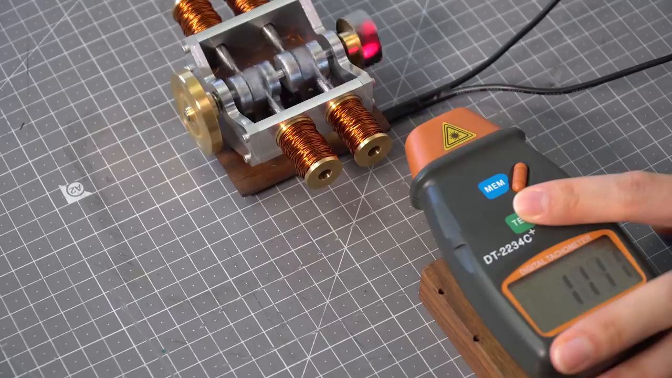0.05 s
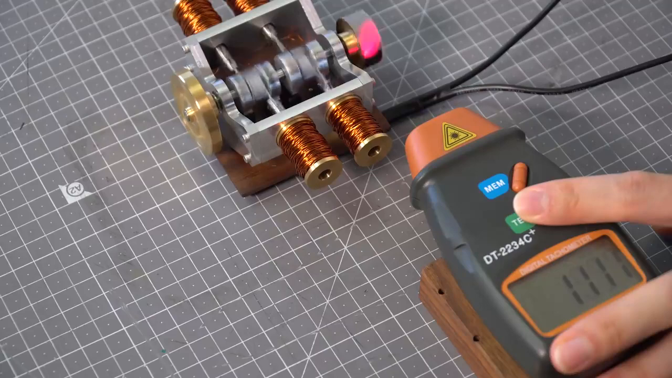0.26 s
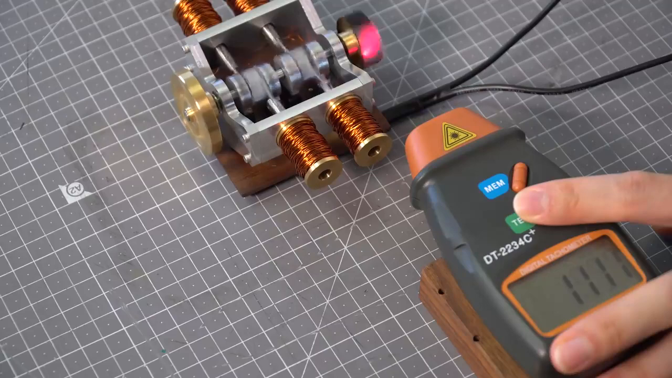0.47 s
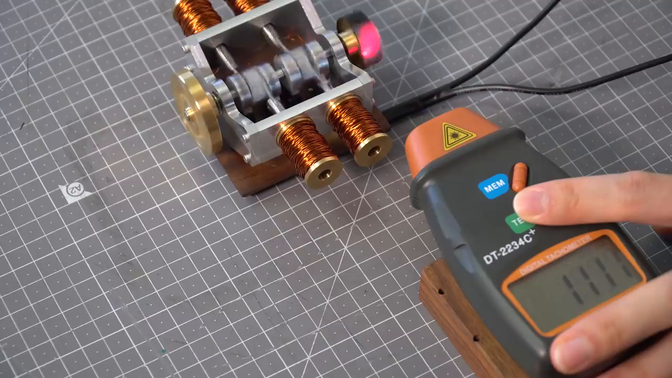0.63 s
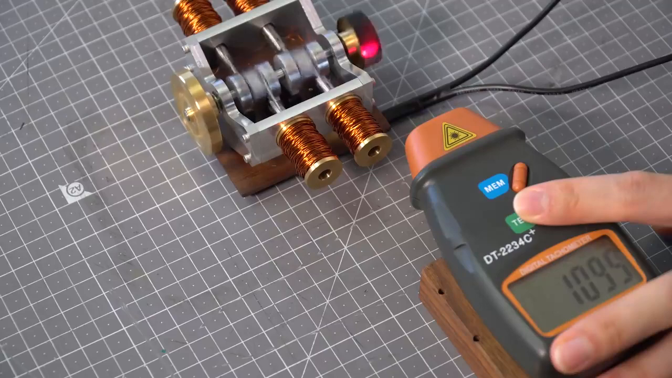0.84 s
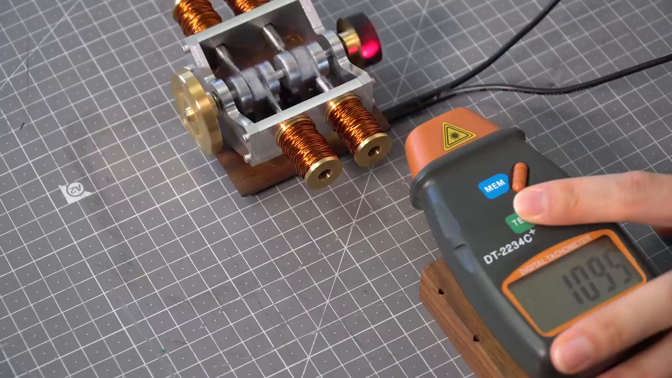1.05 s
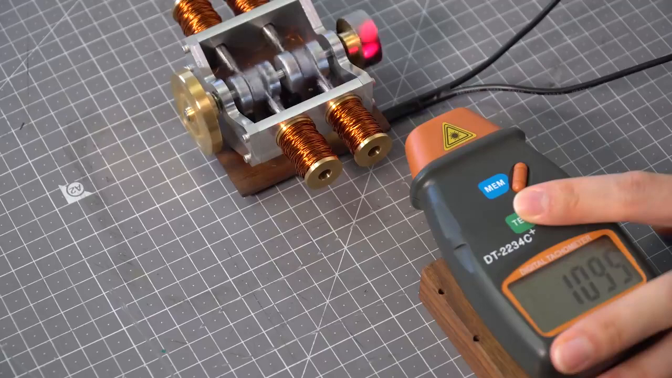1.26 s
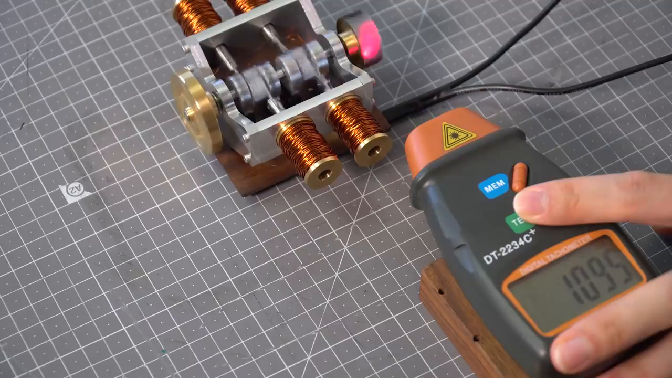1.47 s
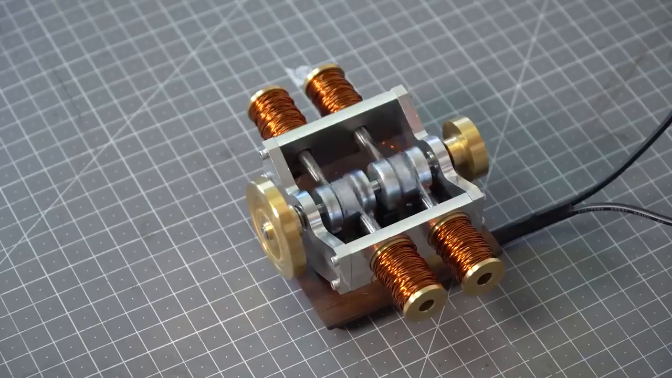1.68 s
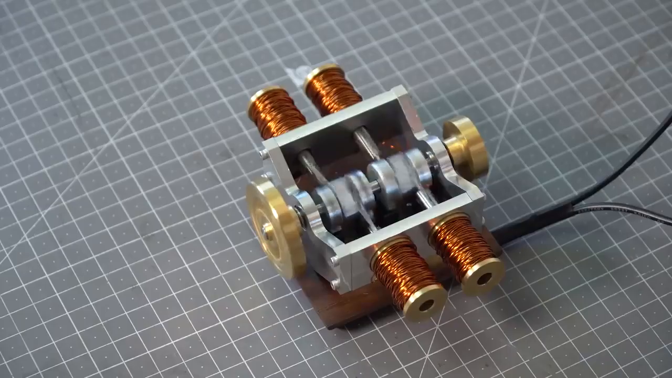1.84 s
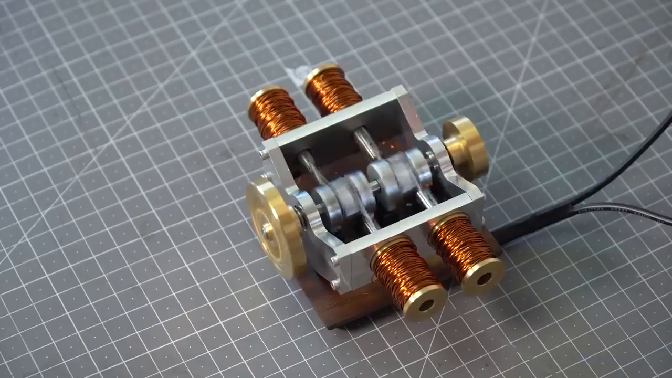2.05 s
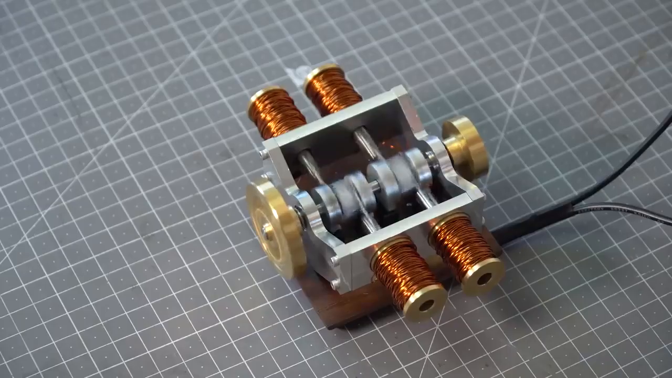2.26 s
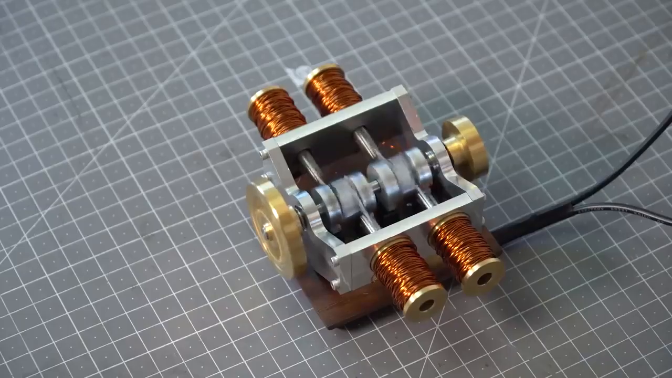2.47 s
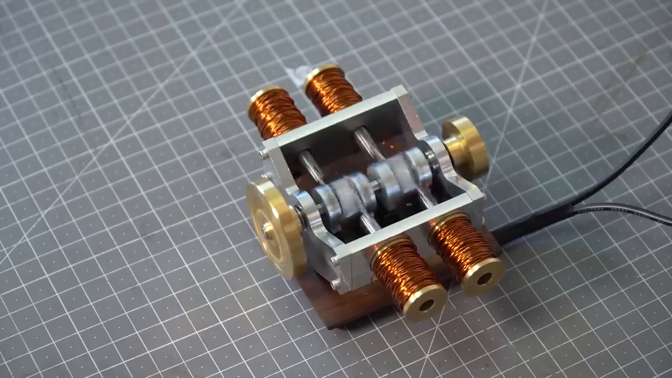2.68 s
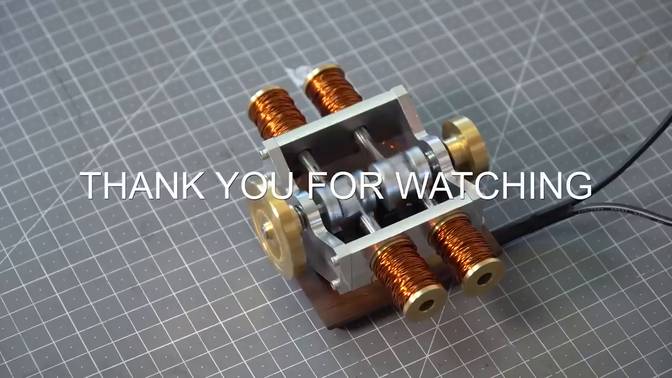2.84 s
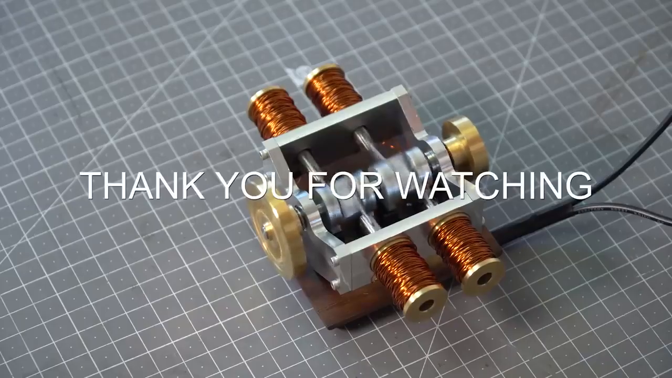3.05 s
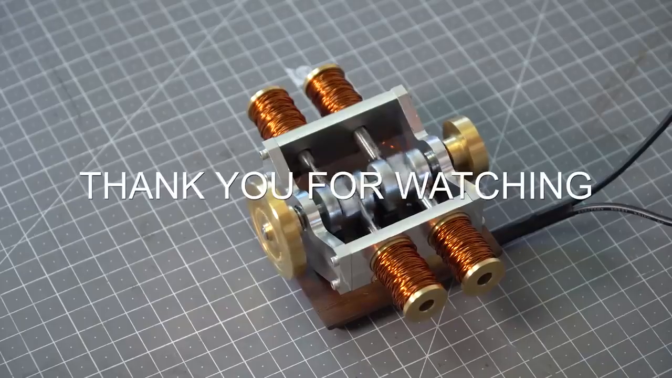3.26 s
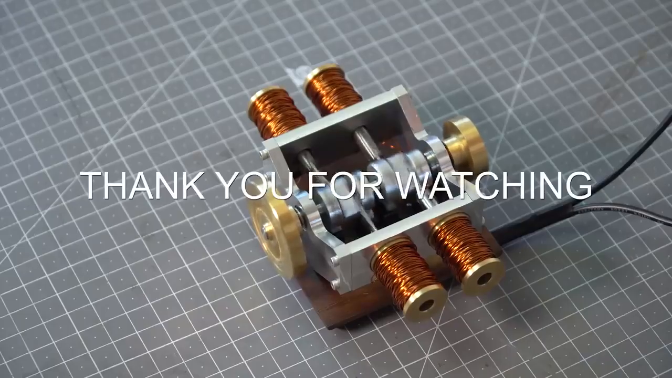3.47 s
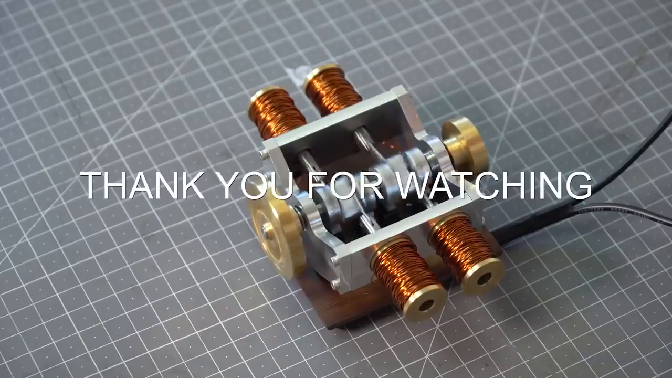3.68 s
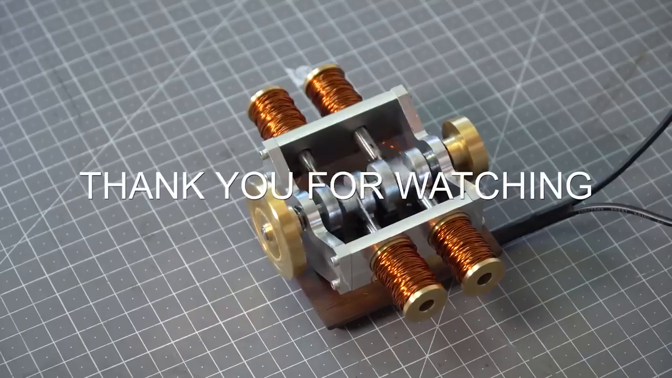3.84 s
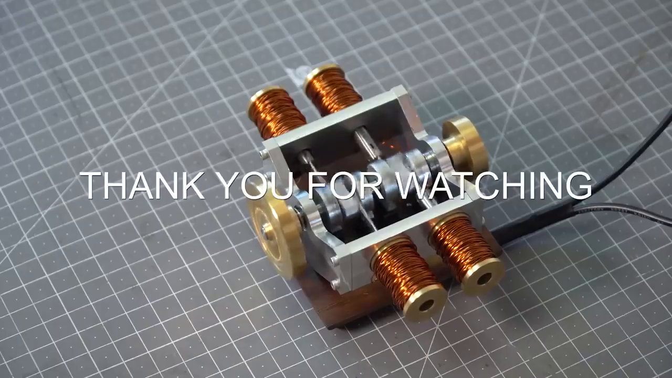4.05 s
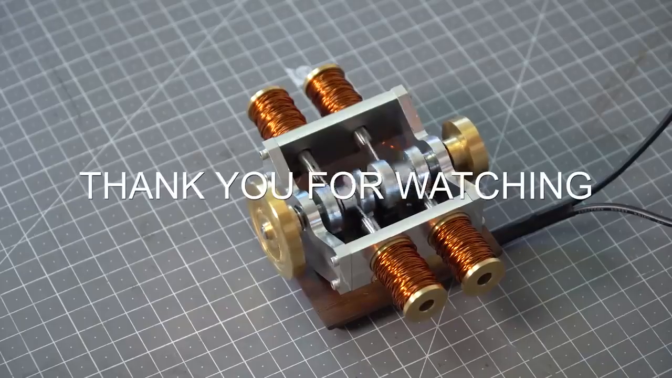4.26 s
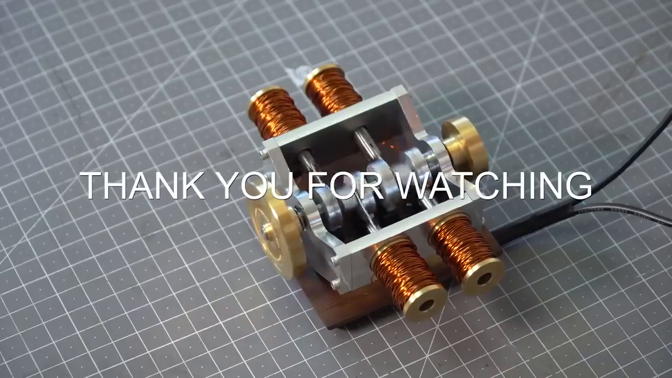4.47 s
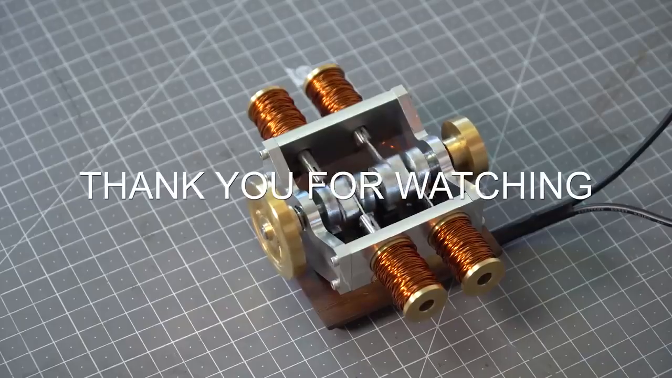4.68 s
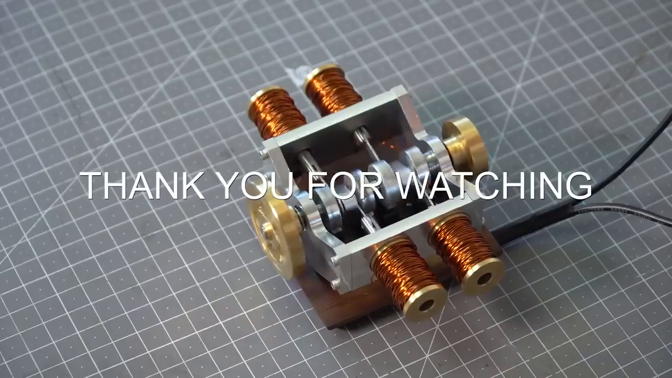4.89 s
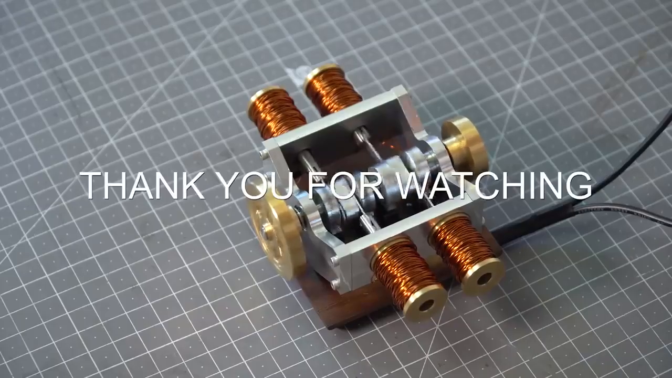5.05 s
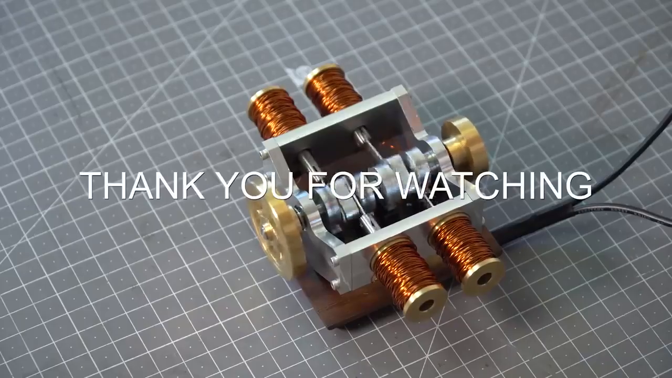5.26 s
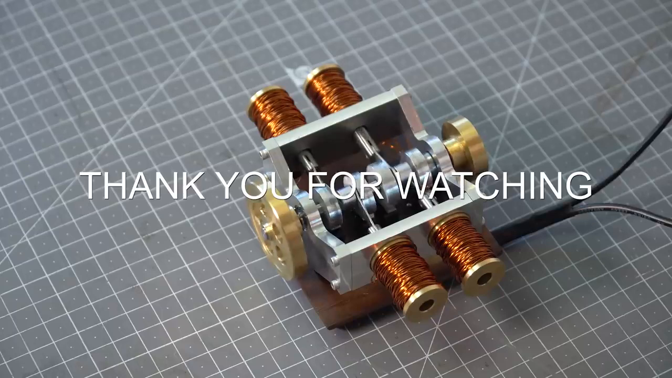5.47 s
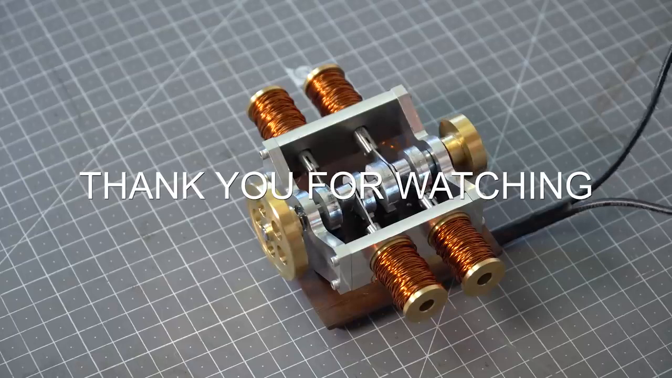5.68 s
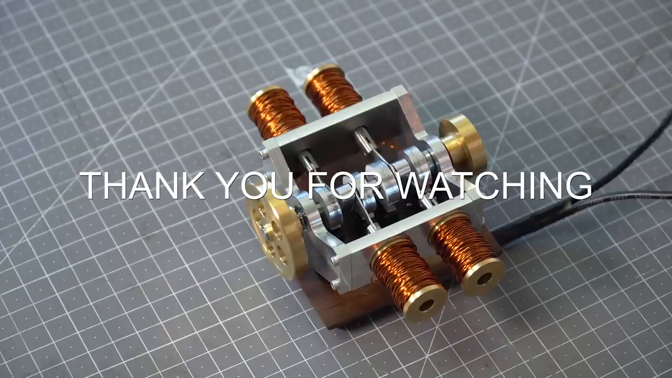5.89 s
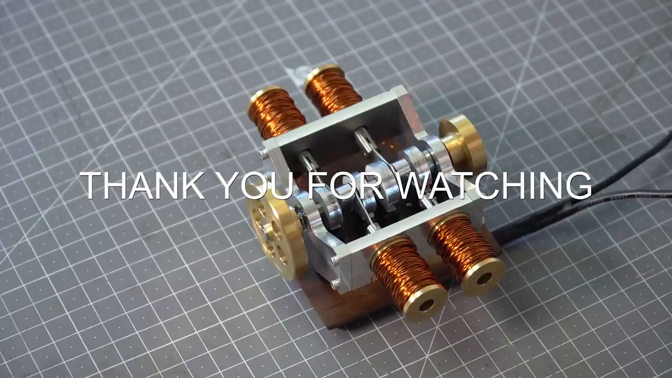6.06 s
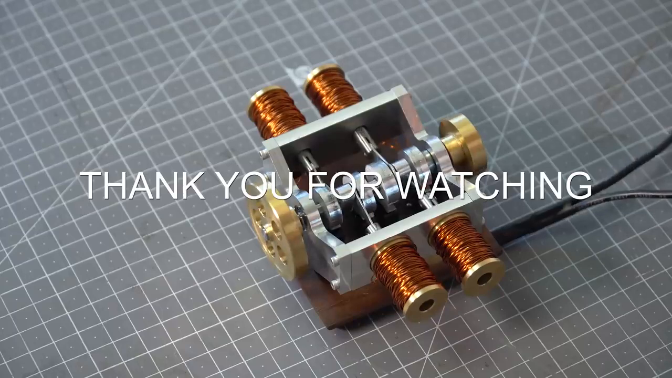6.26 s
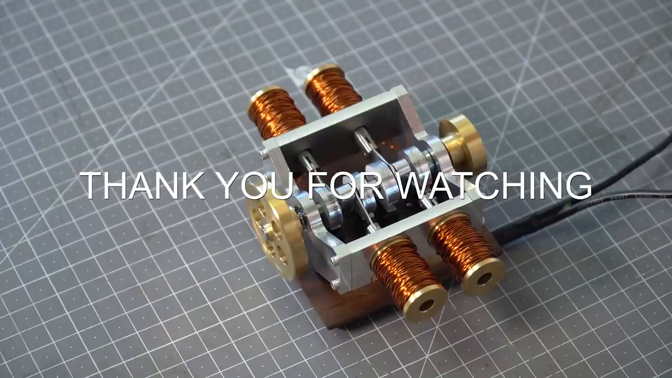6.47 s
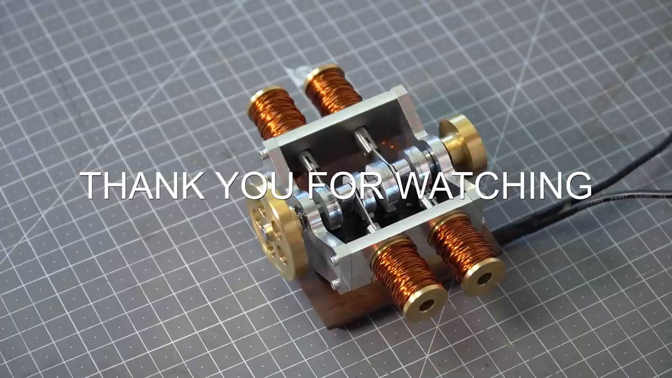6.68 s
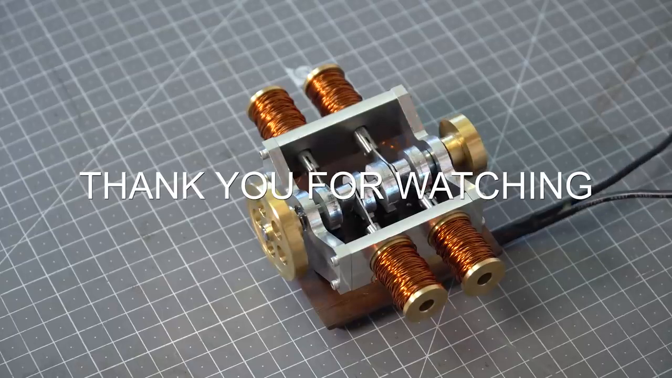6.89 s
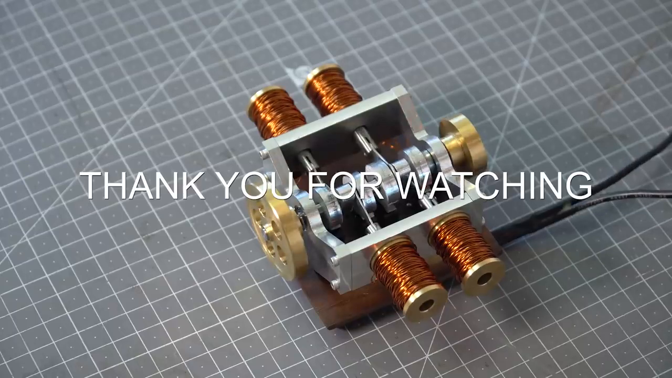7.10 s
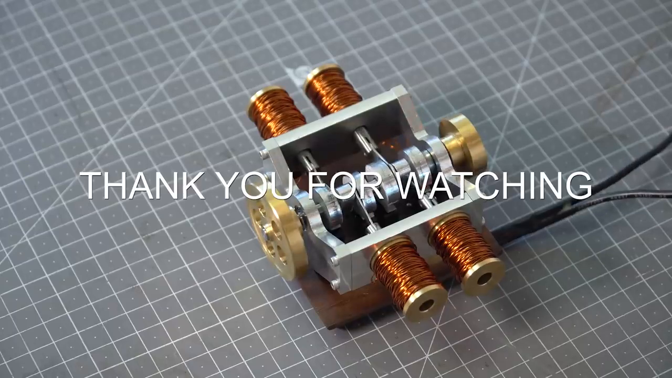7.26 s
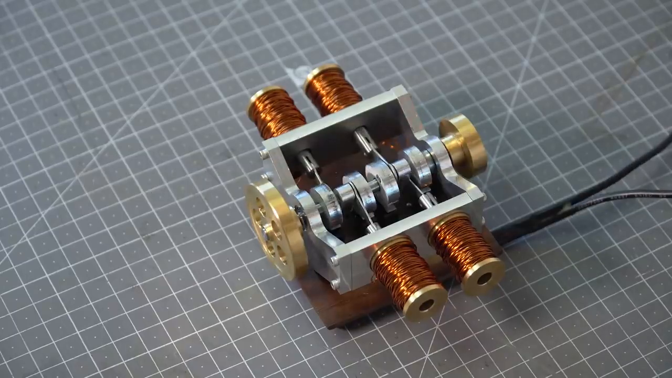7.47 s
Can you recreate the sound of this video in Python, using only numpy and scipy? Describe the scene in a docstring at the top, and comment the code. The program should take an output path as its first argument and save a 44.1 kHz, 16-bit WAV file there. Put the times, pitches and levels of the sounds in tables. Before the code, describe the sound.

A miniature solenoid engine runs on a table in a small room, its rods and plungers making a fast, even metallic clatter over a low hum. The clatter abruptly turns slightly faster. Then the power goes off and it slows and fades into separate ticks and clacks until the crank catches and stops. A few soft, dull bumps and faint scuffs follow, all heard from close by.

```python
"""A fast, even metallic clatter: a miniature four-coil solenoid engine on a cutting mat in a small room.
Each turn repeats a pattern of contact ticks and rod knocks over the plungers' rub, and shakes the table.
A second, faster run follows at once. The power goes off: drag and friction slow the crank, and its
loose rods tick and clack once a turn until it catches. Soft bumps and faint scuffs follow."""
import sys
import numpy as np
from scipy import signal
from scipy.fft import rfft, irfft
from scipy.io import wavfile

SR = 44100
rng = np.random.default_rng(int(sys.argv[2]) if len(sys.argv) > 2 else 0)


def transcribe(u):
    """Save the signal u as a 16-bit wav file named by the first command-line argument.

    u: samples, shape (n,) or (channels, n), limited to [-1, 1]; the rate is SR.
    q: integer samples, one column per channel.
    """
    v = np.clip(np.atleast_2d(u).T, -1, 1)
    q = np.round(v * 32767).astype(np.int16)
    wavfile.write(sys.argv[1], SR, q)


N = 332068
TIME = np.arange(N) / SR
SECOND_RUN_S, POWER_OFF_S, STOP_S = 1.75, 3.217, 5.66
FIRST_RUN = TIME < SECOND_RUN_S
FULL_TURNS_PER_S, CRAWL_TURNS_PER_S = 19, 2.9
DRIVE_DB_PER_OCTAVE = 13.5  # loss per halving of speed after power-off


def from_db(db):
    """Decibels to gain."""
    return 10 ** (np.asarray(db) / 20)


def rms_one(x):
    """Scale to unit power."""
    return x / np.sqrt(np.mean(x ** 2) + 1e-20)


def in_time(rows):
    """Rows of (s, value) to one value per sample."""
    return np.interp(TIME, *np.transpose(rows))


def drift(rate_hz):
    """Random wander of unit power, with rate_hz new values a second."""
    steps = np.arange(N // 16)
    return rms_one(np.interp(TIME * rate_hz, steps, rng.standard_normal(len(steps))))


def colour(x, spectrum, size=4096):
    """Minimum-phase filter from rows of (Hz, dB)."""
    hz, db = np.transpose(spectrum)
    bin_hz = np.arange(size // 2 + 1) * SR / size
    gain = from_db(np.interp(np.log(bin_hz + 1), np.log(hz), db))
    cepstrum = irfft(np.log(gain))
    cepstrum[1:size // 2] *= 2
    cepstrum[size // 2 + 1:] = 0
    impulse = irfft(np.exp(rfft(cepstrum)))
    return signal.oaconvolve(x, impulse)[:len(x)]


def resonate(force, modes):
    """The force plus the modes it sets ringing."""
    out = force.copy()
    for hz, width_hz, db in modes:
        r = np.exp(-np.pi * width_hz / SR)
        feedforward = [(1 - r * r) / 2, 0, (r * r - 1) / 2]
        feedback = [1, -2 * r * np.cos(2 * np.pi * hz / SR), r * r]
        out += from_db(db) * signal.lfilter(feedforward, feedback, force + 1e-18)
    return out


def bursts(times_s, db, decay_s):
    """One rough, decaying burst of force per contact."""
    clicks = np.zeros(N)
    np.add.at(clicks, np.clip(np.asarray(times_s) * SR, 0, N - 1).astype(int), from_db(db))
    envelope = signal.lfilter([1], [1, -np.exp(-1 / (decay_s * SR))], clicks + 1e-18)
    return envelope * rng.standard_normal(N)


def crank_speed(glide_turns_per_s=9.143, drag_s=.579, friction_turns_per_s2=2.36, stall_s=.1):
    """Turns per second: driven, then slowed quickly by drag and evenly by friction until it stalls."""
    # Each row: time in seconds, driven speed in turns per second.
    driven = [(0, 18.69), (.45, 18.11), (1.749, 18.08), (1.751, 20.27), (2.3, 19.63), (2.75, 19.555),
              (3.217, 18.65)]
    free_s = np.maximum(TIME - POWER_OFF_S, 0)
    above_glide = (in_time(driven) - glide_turns_per_s) * np.exp(-free_s / drag_s)
    speed = glide_turns_per_s + above_glide - friction_turns_per_s2 * free_s
    return np.maximum(speed, 0) * np.clip((STOP_S - TIME) / stall_s, 0, 1)


def repeat_pattern(turns, pattern, start_s, end_s, jitter_s, spread_db):
    """The pattern once a turn, never quite alike: rows of (s, tick dB, knock dB)."""
    rows = np.array([(turn + at, tick, knock)
                     for turn in range(int(turns[-1])) for at, tick, knock in pattern])
    scatter = rng.standard_normal((len(rows), 3))
    times_s = np.interp(rows[:, 0], turns, TIME) + jitter_s * scatter[:, 0]
    hits = np.column_stack([times_s, rows[:, 1:] + spread_db * scatter[:, 1:]])
    return hits[(times_s > start_s) & (times_s < end_s)]


def ticks_and_knocks(turns, slowing_octaves):
    """Contact and rod forces as the four coils pull in turn; they fade as the crank coasts."""
    # One turn of each run. Each row: crank angle in turns, tick level in dB, knock level in dB.
    first_turn = [(0.176, -13.5, -16), (.286, -12.5, -26), (.31, -17.5, -18.5), (0.399, -16.5, -27),
                  (.507, -15.5, -17), (.73, -17.5, -25.5), (.893, -19, -29), (.99, -26, -11)]
    second_turn = [(.223, -12.5, -16), (.298, -13.5, -18.5), (.40, -33, -15.5), (.507, -15.5, -16),
                   (.74, -13, -16.5), (0.907, -18, -17), (.978, -17.5, -11.5)]
    # Force spectra. Each row: frequency in Hz, gain in dB.
    tick_spectrum = [(400, -11.5), (2000, -0.5), (5000, -3.5), (8000, 3.5), (12000, 9), (16000, 3)]
    knock_spectrum = [(400, -4), (1200, -0.5), (2500, -1.5), (3600, 1), (5000, 2.5), (6500, -3),
                      (16000, -9.5)]
    first = repeat_pattern(turns, first_turn, 0, SECOND_RUN_S, jitter_s=.00018, spread_db=.87)
    second = repeat_pattern(turns, second_turn, SECOND_RUN_S, STOP_S, jitter_s=.00028, spread_db=1.5)
    times_s, tick_db, knock_db = np.vstack([first, second]).T
    loss_db = DRIVE_DB_PER_OCTAVE * np.interp(times_s, TIME, slowing_octaves) * (times_s > POWER_OFF_S)
    ticks = colour(bursts(times_s, tick_db - loss_db, decay_s=.00065), tick_spectrum)
    knocks = colour(bursts(times_s, knock_db - loss_db, decay_s=.0016), knock_spectrum)
    return from_db(-3) * ticks, from_db(-3) * knocks


def friction(grain_db, rattle_db):
    """Friction noise, uneven from grain to grain and in short runs."""
    return rms_one(rng.standard_normal(N) * from_db(grain_db * drift(1400) + rattle_db * drift(190)))


def plungers(turns, speed, slowing_octaves, swing, db_per_octave=8, catch_s=5.57, catch_width_s=.02):
    """Plungers rub in their coils on both strokes, chatter once a turn and scrape as the crank catches."""
    # Force spectra. Each row: frequency in Hz, gain in dB.
    rub_spectrum = [(400, 2.5), (1200, 2.6), (3000, 2.33), (6000, 1.44), (10000, 0.44), (16000, 1.1)]
    chatter_spectrum = [(1200, -35), (2200, -12), (2650, 8), (3150, 0.5), (3900, -15), (6000, -25),
                        (7800, 3.5), (9400, 7), (12000, -6), (16000, -36)]
    scrape_db = 6.5 * np.exp(-((TIME - catch_s) / catch_width_s) ** 2)
    slide_db = np.where(FIRST_RUN, -25, -24) - db_per_octave * slowing_octaves + scrape_db
    stroke_db = 1.05 * np.cos(4 * np.pi * (turns - .02)) + 2.3 * np.cos(2 * np.pi * (turns - .85))
    level = from_db(slide_db + swing * stroke_db)
    rub = colour(friction(grain_db=2, rattle_db=.8) * level, rub_spectrum)
    mid_stroke = np.maximum(np.cos(2 * np.pi * (turns - .97)), 0) ** 2
    chatter = colour(friction(grain_db=1, rattle_db=4.5) * level * mid_stroke * swing, chatter_spectrum)
    moving = np.clip(speed / CRAWL_TURNS_PER_S, 0, 1) ** 2
    return from_db(-3.5) * moving * (rub + from_db(-.5) * chatter)


def frame(force):
    """All engine forces ring the same metal frame."""
    # Each row: mode frequency in Hz, width in Hz, gain in dB.
    modes = [(822.5, 18, 2), (810, 11, -27), (930, 28, -10), (1181, 25, 3.5), (1317, 11, 2.5),
             (2028, 137, -3.5), (2573, 107, -3.5), (2784, 45, -5.5), (3030, 23, -9.5), (3206, 38, 2),
             (3420, 32, -3.5), (3540, 45, -7.5), (3970, 59, -5.5), (4337, 41, -5), (4800, 55, -20),
             (4706, 48, -7.5)]
    # Engine colour in each run. Each row: frequency in Hz, gain in dB.
    first_spectrum = [(240, -25), (400, -6.5), (607, -8), (826, -6.5), (1030, -7.5), (1160, -6), (1380, 1),
                      (1790, -9.5), (2150, -4), (3470, 0), (4650, -1), (6740, -2.5), (11600, -7),
                      (15000, -9.5), (16000, -3)]
    second_spectrum = [(250, -34), (400, -5), (470, -8.5), (700, -7.5), (830, -3.5), (1020, -13),
                       (1220, -4), (1780, -9.5), (2000, -5.5), (3100, -0.5), (3750, -2.5), (4700, -2.5),
                       (6640, -3), (16000, -8.5)]
    ringing = resonate(force, modes)
    return np.where(FIRST_RUN, colour(ringing, first_spectrum), colour(ringing, second_spectrum))


def table_rumble(turns, slowing_octaves, swing, db_per_octave=2.5, settle_db_per_s=49,
                 critical_turns_per_s=11.4, critical_width_octaves=.34):
    """Each stroke shakes the table top; it swells at a critical speed and settles after the stop."""
    # Each row: mode frequency in Hz, width in Hz, gain in dB.
    modes = [(86, 30, -3.5), (153.2, 19, 2.5), (234, 10.2, 9), (286, 11, 7.5), (339, 17, 8),
             (414, 11.5, 10.5), (450, 32, 7.5)]
    # Table-top colour. Each row: frequency in Hz, gain in dB.
    spectrum = [(25, -22), (50, -10), (85, -3), (150, -2), (260, -6.5), (400, -15.5), (600, -18),
                (1000, -35)]
    off_critical_octaves = slowing_octaves - np.log2(FULL_TURNS_PER_S / critical_turns_per_s)
    swell_db = 4 * np.exp(-(off_critical_octaves / critical_width_octaves) ** 2)
    loss_db = db_per_octave * slowing_octaves + settle_db_per_s * np.maximum(TIME - STOP_S, 0)
    stroke_db = .89 * swing * np.cos(4 * np.pi * (turns - .094))
    push = rng.standard_normal(N) * from_db(-26 + swell_db - loss_db + stroke_db)
    return colour(resonate(push, modes), spectrum)


def base_hum(turns, slowing_octaves, waver_db=1.5):
    """The base hums at multiples of the crank speed; in the first run it also rocks three times a turn."""
    # Each row: time in seconds, relative rocking level in dB.
    rocking = [(0.0, -50), (0.58, -54), (0.634, -45), (1.046, -34.5), (1.486, -37.5), (1.74, -42.5)]
    # Each row: multiple of crank speed, first-run level in dB, second-run level in dB,
    # second-run fade in dB per second (negative counts as none).
    harmonics = [(4, -61, -55, -3), (5, -48.5, -40, 10), (6, -52, -57, 7), (8, -55, -46.5, 0),
                 (9, -54, -62, 3), (11, -52, -55.5, 0), (12, -71, -59, 0), (13, -48, -57, -2),
                 (14, -56, -66, 2), (17, -58, -48, 6.5), (21, -68, -60, -1), (23, -62, -53.5, 5)]
    tones = from_db(in_time(rocking) + 3.5) * FIRST_RUN * np.sin(3 * 2 * np.pi * turns)
    for multiple, first_db, second_db, fade_db_per_s in harmonics:
        db = np.where(FIRST_RUN, first_db, second_db - max(fade_db_per_s, 0) * (TIME - SECOND_RUN_S))
        tones += from_db(db + waver_db * drift(15)) * np.sin(2 * np.pi * multiple * turns)
    return tones * from_db(-DRIVE_DB_PER_OCTAVE * slowing_octaves * (TIME > POWER_OFF_S))


def diffuse(mid, side):
    """Sound from all round: alike in both ears in the bass, unrelated in the treble."""
    # Each row: frequency in Hz, side against mid in dB.
    width = [(60, -21), (150, -11), (300, -5), (700, -5.5), (1300, -7), (2500, -4.5), (4500, 0.5),
             (16000, -1.5)]
    side = colour(side, width)
    return np.array([mid + side, mid - side])


def room(x, t60_s, wet_db, early_db, early_s, gap_s):
    """Direct sound, close reflections from the table, and the room's tail."""
    # Reverberation colour. Each row: frequency in Hz, gain in dB.
    walls = [(100, -13.5), (600, 0.5), (3000, 0.5), (6000, 1), (10000, 0), (16000, 0)]
    t = TIME[:SR // 2]
    late = from_db(wet_db - 60 * t / t60_s) / np.sqrt(t60_s * SR / np.log(1e6))
    early = from_db(early_db) * np.exp(-t / early_s) / np.sqrt(early_s * SR / 2)
    decay = np.hypot(late, early) * np.clip(t / gap_s, 0, 1) ** 2
    mid, side = [colour(noise * decay, walls) for noise in rng.standard_normal((2, len(t)))]
    return x + signal.fftconvolve(x[None], diffuse(mid, side), axes=1)[:, :N]


def room_tone():
    """Faint, steady, diffuse noise, mostly bass."""
    # Each row: frequency in Hz, relative level in dB.
    spectrum = [(20, -30), (36, -2), (52, 0.5), (85, -5.5), (170, -8.5), (260, -6.5), (320, -11),
                (450, -9.5), (620, -16.5), (770, -18), (1050, -13), (1450, -21), (4000, -28),
                (16000, -31.5)]
    mid, side = [rms_one(colour(noise, spectrum)) for noise in rng.standard_normal((2, N))]
    return from_db(-57.5) * diffuse(mid, side)


def once_a_turn(turns, speed, at_turns, db, fall_db_per_octave=0, hardest_turns_per_s=8, from_s=3.35):
    """One contact each time the coasting crank passes an angle: rows of (s, dB)."""
    passes = np.flatnonzero((np.diff(np.floor(turns - at_turns)) > 0) & (TIME[1:] > from_s))
    octaves = np.log2(speed[passes] / hardest_turns_per_s)
    return np.column_stack([TIME[passes], db - fall_db_per_octave * np.abs(octaves)])


def loose_rods(turns, speed, lag_s=.001, tick_edge_hz=3400):
    """Coasting, a rod takes up its play with a thin tick, then clacks over dead centre and chatters."""
    # The tick's wandering place. Each row: time in seconds, crank angle in turns.
    play_angle = [(3.4, .27), (3.7, .305), (4.65, .325), (5.0, .285), (5.41, .256)]
    # Lighter taps of the other rods. Each row: crank angle in turns, level in dB.
    taps = [(.84, -26), (.99, -27)]
    # Clacks out of step, one early, two as the crank catches. Each row: start in seconds, level in dB.
    stray_clacks = [(5.02, -20), (5.559, -36), (5.569, -33)]
    # Force spectra. Each row: frequency in Hz, gain in dB.
    tick_spectrum = [(400, -8.5), (1500, -3), (3000, -2), (5500, -7.5), (9500, 0.5), (12500, 4.5),
                     (16000, 2)]
    clack_spectrum = [(400, -10.5), (800, 5), (1250, 5), (1650, 2), (2100, 6.5), (3200, 2), (5700, 5),
                      (6800, -4), (16000, -14)]
    light = [once_a_turn(turns, speed, at, db) for at, db in [(in_time(play_angle), -16.5), *taps]]
    heavy = once_a_turn(turns, speed, at_turns=.484, db=-12.5, fall_db_per_octave=3.5)
    tick_s, tick_db = np.vstack(light).T
    clack_s, clack_db = np.vstack([heavy, stray_clacks]).T
    highpass = signal.butter(2, tick_edge_hz, "high", fs=SR, output="sos")
    ticks = signal.sosfilt(highpass, bursts(tick_s + lag_s, tick_db + 4, decay_s=.00049))
    clack_edges = bursts(clack_s + lag_s, clack_db + 3.5, decay_s=.00031)
    clacks = bursts(clack_s + lag_s, clack_db - 6, decay_s=.0015)
    chatter = bursts(clack_s + lag_s, clack_db - 15, decay_s=.019)
    return colour(ticks + clack_edges, tick_spectrum), colour(clacks + chatter, clack_spectrum)


def bumps():
    """Soft, dull bumps on the table."""
    # Each row: start in seconds, relative level in dB.
    hits = [(5.574, -36.5), (5.62, -52), (5.978, -38), (6.001, -39), (6.022, -38)]
    # Each row: frequency in Hz, gain in dB.
    spectrum = [(30, -20), (60, -2), (100, 6), (160, -5), (235, 1), (300, -19), (450, -19), (700, -30),
                (2000, -64)]
    return from_db(16) * colour(bursts(*np.transpose(hits), decay_s=.018), spectrum)


def scuffs(ring_width_hz=450):
    """Faint scuffs on the table, each with one broad resonance."""
    # Each row: start in seconds, decay in seconds, relative level in dB, ring in Hz, ring gain in dB.
    strokes = [(6.166, .014, -55.5, 3300, 1), (6.19, 0.091, -63.5, 1130, 5), (6.225, .04, -64, 5370, 15),
               (6.29, .04, -63, 2600, 4), (6.498, 0.063, -53.5, 2050, 0)]
    # Each row: frequency in Hz, gain in dB.
    spectrum = [(200, -2), (600, -2), (1150, 1.5), (2100, -5.5), (3000, -9), (5400, -10), (7000, -14),
                (16000, -24)]
    rubbing = sum(resonate(bursts([start_s], [db], decay_s), [(ring_hz, ring_width_hz, ring_db)])
                  for start_s, decay_s, db, ring_hz, ring_db in strokes)
    return from_db(9.5) * colour(rubbing, spectrum)


def scene():
    """The crank angle drives every part of the engine."""
    speed = crank_speed()
    turns = np.cumsum(speed) / SR - .022
    slowing_octaves = np.log2(FULL_TURNS_PER_S / np.maximum(speed, CRAWL_TURNS_PER_S))
    swing = np.interp(speed, [5, 18], [1.5, .5])  # a slower crank pulses more within a turn
    forces = [plungers(turns, speed, slowing_octaves, swing),
              *ticks_and_knocks(turns, slowing_octaves),
              *loose_rods(turns, speed)]
    # Each part radiates from its own place, so meets its own reflections.
    engine = sum(room(frame(force), t60_s=.37, wet_db=-2, early_db=-6, early_s=.0062, gap_s=.004)
                 for force in forces)
    engine *= from_db(FIRST_RUN * np.array([[.3], [-.3]]))  # first run slightly left
    table = table_rumble(turns, slowing_octaves, swing) + bumps() + scuffs()
    table = room(table, t60_s=.4, wet_db=-7.5, early_db=-19, early_s=.0067, gap_s=.0034)
    return engine + table + room_tone() + base_hum(turns, slowing_octaves)


def record(dry):
    """Steep low-pass at 15750 Hz."""
    return signal.sosfilt(signal.ellip(12, .1, 80, 15750, fs=SR, output="sos"), dry)


dry = scene()
out = record(dry)
transcribe(out)
```